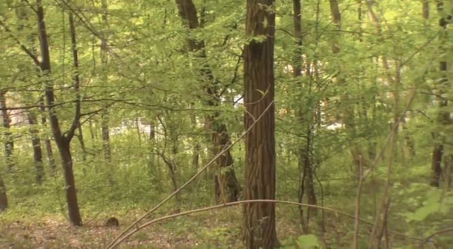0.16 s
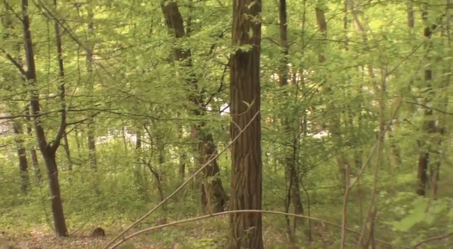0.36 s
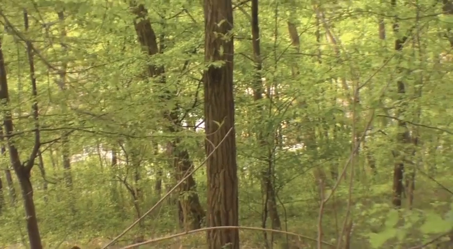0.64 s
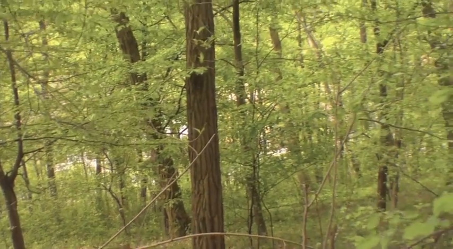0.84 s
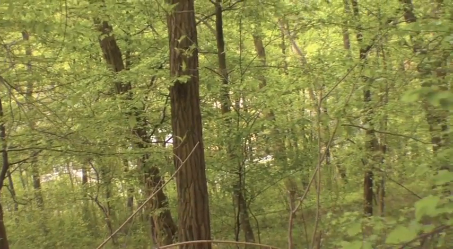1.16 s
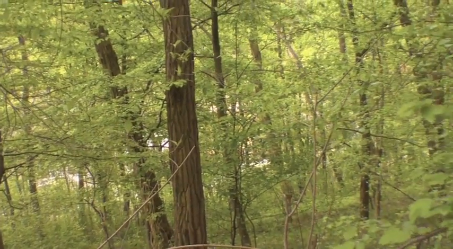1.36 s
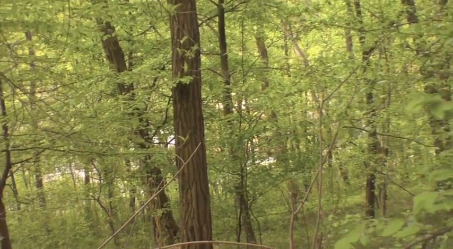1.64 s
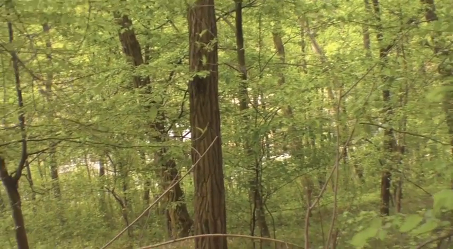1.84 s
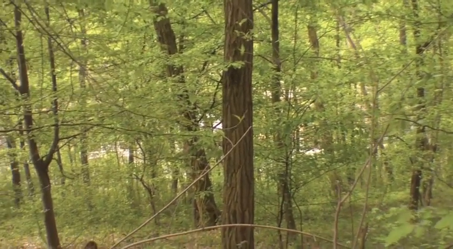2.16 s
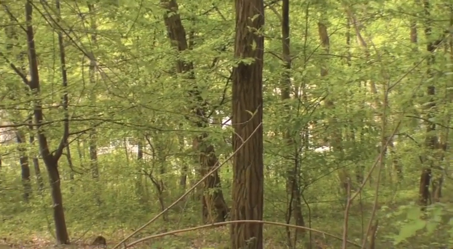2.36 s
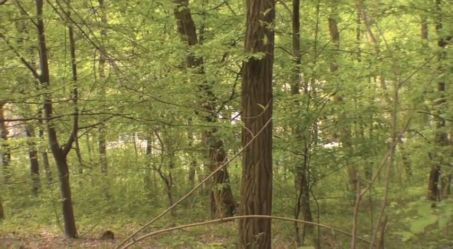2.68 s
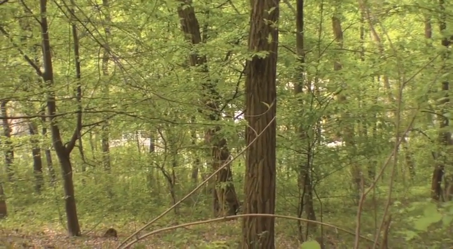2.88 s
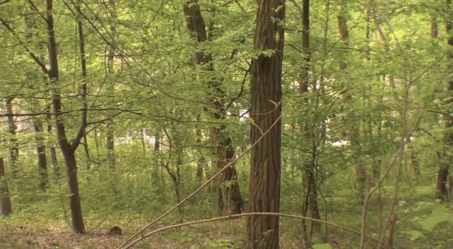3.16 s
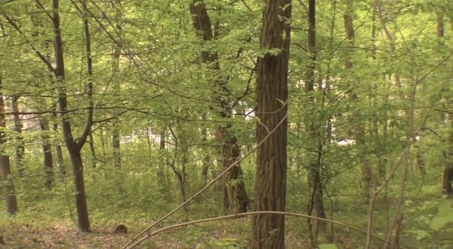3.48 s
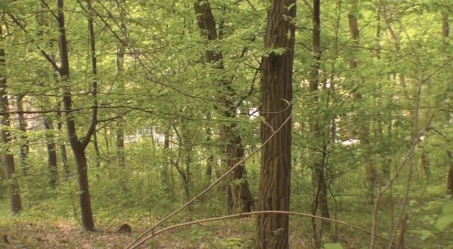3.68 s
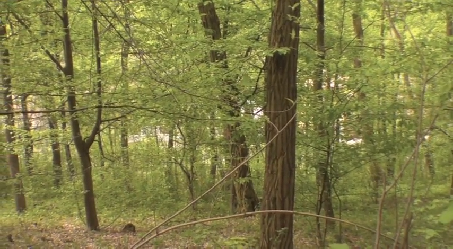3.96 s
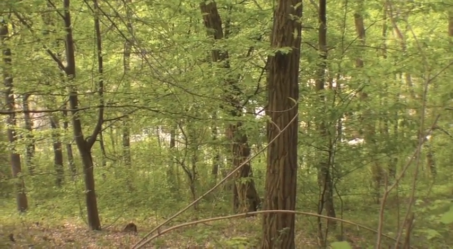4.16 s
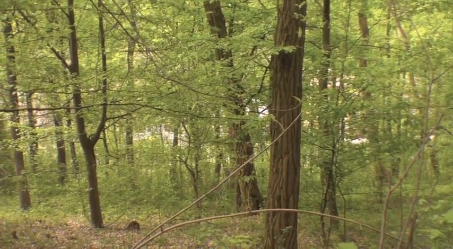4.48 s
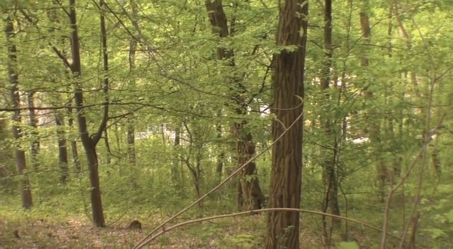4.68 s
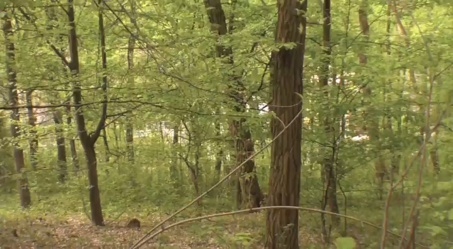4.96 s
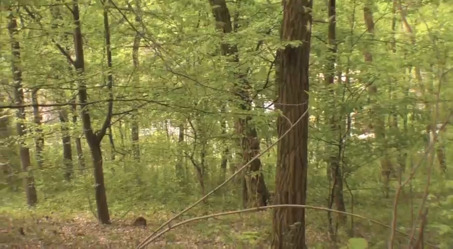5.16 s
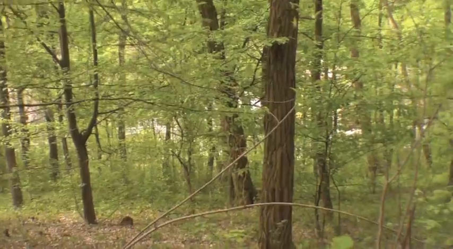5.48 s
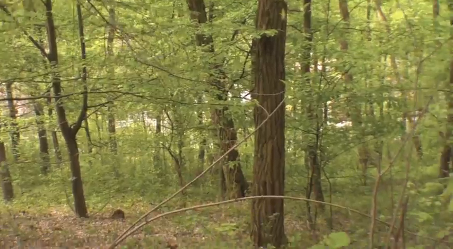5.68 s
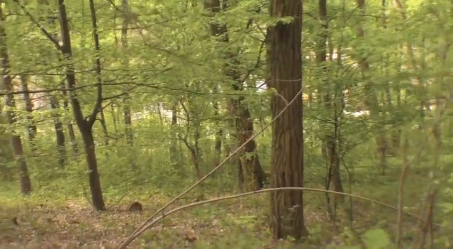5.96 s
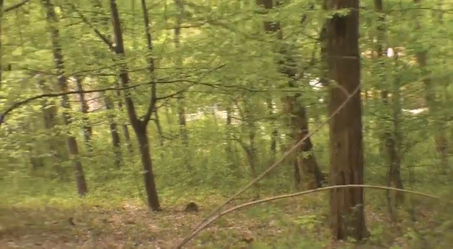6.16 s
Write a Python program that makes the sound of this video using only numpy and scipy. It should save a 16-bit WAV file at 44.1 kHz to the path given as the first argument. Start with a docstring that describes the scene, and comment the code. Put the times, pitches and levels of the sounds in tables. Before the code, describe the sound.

In a leafy wood, many small birds give short whistles, chirps and dry buzzes, with a blurred chorus farther off and a soft tail among the trunks. Beneath lies a quiet, low traffic rumble with a distant engine changing gear. A few tiny leaf ticks sound close to the stereo microphone; after five seconds a foot rustles, then crunches abruptly into dry leaves, by far the loudest event.

```python
"""Birdsong and footfall in a wood

Songbirds whistle, sweep, buzz and trill as gliding or frequency-modulated sines; the trunks scatter them into a
short decaying tail, modelled by convolution with shaped noise. Far traffic is smooth noise with a shaped spectrum.
A distant engine changing gear and an idling drone are sines of varying frequency. Near the microphone a foot shifts
and lands in dry leaves: random impulses crack under its weight, and brief noise bursts snap."""
import sys
import numpy as np
from scipy import signal
from scipy.fft import rfft, irfft
from scipy.io import wavfile

SR = 44100
rng = np.random.default_rng(int(sys.argv[2]) if len(sys.argv) > 2 else 0)


def voltage_ratio(level):
    """Linear amplitude factor for a level in decibels (scalar or array-like)."""
    return 10 ** (np.asarray(level, float) / 20)


def wav_record(signal):
    """Record a signal, one row per channel, as 16-bit PCM in the file named by sys.argv[1]."""
    frames = np.transpose(np.atleast_2d(signal))
    bounded = np.clip(frames, -1, 1)
    # unit amplitude maps onto the largest positive 16-bit level
    quanta = np.round(bounded * 32767).astype(np.int16)
    wavfile.write(sys.argv[1], SR, quanta)


N = 278929

# Harsh bird calls, each an upward flick and then a wide buzz. Each row: start in seconds, flick start in Hz,
# flick length in seconds, flick level in dB, buzz level in dB.
HARSH_CALLS = [(4.657, 2595, 0.043, -42, -47), (4.856, 2598, 0.029, -41, -49.5),
               (5.028, 3350, 0.031, -46, -45.5), (5.218, 3300, 0.017, -37, -48)]


def rms_one(x):
    """Normalization: divide a signal by its root-mean-square value."""
    return x / np.sqrt(np.mean(x ** 2) + 1e-20)


def in_time(rows):
    """Linear interpolation of a time curve: its columns at every sample."""
    s, *columns = np.transpose(rows)
    return [np.interp(np.arange(N) / SR, s, c) for c in columns]


def at_hz(points, hz):
    """Interpolation of a spectrum along a logarithmic frequency axis."""
    known_hz, values = np.array(points).T
    return np.interp(np.log(hz), np.log(known_hz), values)


def drift(rate):
    """Low-pass filtered noise: a random fluctuation of rms 1, slower for a lower rate in Hz."""
    step = 40      # samples between computed values
    r = np.exp(-2 * np.pi * rate * step / SR)
    noise = rng.standard_normal(N // step + 2002)
    slow = signal.lfilter([1], [1, -2 * r, r * r], noise)[2000:]      # the filter has settled
    return np.interp(np.arange(N) / step, np.arange(len(slow)), rms_one(slow))


def coloured(pair, spectrum, likeness):
    """Spectral shaping and partial coherence: independent mid and side become left and right of rms 1."""
    hz = np.maximum(np.fft.rfftfreq(N, 1 / SR), 1)
    alike = np.clip(at_hz(likeness, hz), 0, 1)
    mid, side = rfft(pair) * voltage_ratio(at_hz(spectrum, hz)) * np.sqrt([1 + alike, 1 - alike])
    return rms_one(irfft([mid + side, mid - side], N))


def air():
    """Broadband noise with a falling spectrum: far traffic and air, swelling with the traffic."""
    # Each row: frequency in Hz, relative spectral density in dB per Hz.
    air_spectrum = [(12, -17), (20, 7), (38, -7), (58, 0), (79, -9), (150, -14), (367, -17), (660, -15),
                    (1000, -19), (1440, -19), (1860, -22), (3250, -23), (6360, -35), (14700, -37),
                    (16000, -35)]
    # Each row: frequency in Hz, left-right coherence from 0 to 1.
    air_likeness = [(60, 0.3), (180, 0.63), (550, 0.9), (1650, 0.94), (4970, 0.66), (15000, 0.044)]
    # Slow level of the traffic. Each row: time in seconds, level in dB before random drift.
    traffic_swell = [(0.0, -39), (5.17, -37.9), (6.32, -36)]
    swell_db, = in_time(traffic_swell)
    noise = coloured(rng.standard_normal((2, N)), air_spectrum, air_likeness)
    return voltage_ratio(swell_db + 0.71 * drift(5.9)) * noise


def hum(curve, wobble_db):
    """Phase integration of a varying frequency: a low engine order whose level wobbles on its way through air."""
    hz, db = in_time(curve)
    phase = 2 * np.pi * np.cumsum(hz * (1 + 0.011 * drift(8.5))) / SR
    level = voltage_ratio(db + wobble_db * drift(3.3))
    return np.sqrt(2) * level * np.sin(phase) * voltage_ratio([[.8], [-.8]])      # slightly stronger on the left


def engine():
    """Firing frequency follows engine speed: a distant engine slows and changes gear."""
    # Each row: time in seconds, mean firing frequency in Hz, level in dB before wobble and left-right offset.
    engine_curve = [(0, 90.5, -48.5), (1.02, 93, -55.5), (1.87, 95.2, -46.5), (2.1, 96.9, -57.5),
                    (2.75, 96.9, -51), (3.15, 90, -52), (3.33, 77.5, -45), (3.45, 70.1, -43.5),
                    (3.8, 58.63, -32.5), (4.1, 48.06, -45.5), (4.3, 49, -43.5), (4.49, 63.7, -36.5),
                    (4.56, 68.6, -43), (4.87, 69.04, -44), (5.05, 68.6, -33), (5.67, 68.8, -34.5),
                    (5.76, 70.6, -44.5), (6.05, 69.6, -33.5), (6.32, 74.7, -44)]
    return hum(engine_curve, wobble_db=1.2)


def drone():
    """A nearly steady low sine: an idling engine."""
    # Each row: time in seconds, mean frequency in Hz, level in dB before wobble and left-right offset.
    drone_curve = [(0, 43.5, -51), (2.27, 45.1, -43), (3.7, 46.8, -48.5), (5.23, 46.4, -52),
                   (6.32, 46.5, -40.5)]
    return hum(drone_curve, wobble_db=1.5)


def whistles(notes, waver, overtone_db, edge, flutter_db):
    """Frequency glide by phase integration: unsteady sines with one overtone and soft edges, each from its side.

    Each note: start and length in s; start, middle and end in Hz; level in dB."""
    out = np.zeros((2, N))
    unsteady = 1 + waver * drift(60)
    sides_db = rng.normal(0, 0.7, len(notes))
    for (s, length, start, middle, end, db), side in zip(notes, sides_db):
        at = round(s * SR)
        u = np.linspace(0, 1, max(round(length * SR), 8))[:N - at]
        # a parabola through the start, middle and end frequencies
        hz = start * (1 - u) * (1 - 2 * u) + 4 * middle * u * (1 - u) + end * u * (2 * u - 1)
        phase = 2 * np.pi * np.cumsum(hz * unsteady[at:at + len(u)]) / SR
        rise_or_fall = np.minimum(u, (1 - u) / 2) / edge      # the end fades slower
        shape = np.sin(np.pi / 2 * np.clip(rise_or_fall, 0, 1))
        wave = np.sin(phase) + voltage_ratio(overtone_db) * np.sin(2 * phase)
        out[:, at:at + len(u)] += np.sqrt(2) * voltage_ratio(db) * shape * wave * voltage_ratio([[side], [-side]])
    return out * voltage_ratio(flutter_db * drift(64))      # moving air makes the level flutter


def chorus(band_hz, count):
    """Superposition of many short sweeps at random moments and pitches inside one register; rms 1."""
    when, pitch, sweep, length, size = rng.random((count, 5)).T
    hz = band_hz[0] + (band_hz[1] - band_hz[0]) * pitch
    glide = 1 + 0.2416 * (sweep - .5)
    start_s = when * (N / SR - .01)
    length_s = 0.01155 + 0.0402 * length
    rows = np.transpose([start_s, length_s, hz / glide, hz, hz * glide, 10 * size])
    return rms_one(whistles(rows, waver=0.011, overtone_db=-35, edge=0.23, flutter_db=0.0))


def far_chorus():
    """Dense superposition in two registers: far birds too blurred to tell notes apart."""
    # Levels ahead of the direct and scattered gains. Each row: time in seconds, low voices in dB, high voices in dB.
    chorus_levels = [(0, -58, -72), (1.3, -68, -95), (2.6, -73, -62), (3.5, -51, -54), (5.2, -52.5, -60),
                     (6.32, -98, -64)]
    low_db, high_db = in_time(chorus_levels)
    low = voltage_ratio(low_db) * chorus((2500, 4100), count=500)
    high = voltage_ratio(high_db) * chorus((4200, 5870), count=500)
    return low + high


def weight():
    """Exponential growth and decay: each tread builds up and lets go steadily in dB; the heaviest counts."""
    # Each row: time of full weight in seconds, level in dB, build-up in dB per second, release in dB per second.
    treads = [(.1, -55, 20.0, 30.0), (2.25, -53.5, 60.0, 30.0), (5.32, -47.5, 300.0, 5.0),
              (5.41, -44, 200.0, 17.5), (5.585, -35, 69, 377), (5.62, -46, 313, 176),
              (6.1, -45.5, 160.0, 14), (6.222, -18.5, 698, 12.0), (6.245, -16, 400.0, 70.0),
              (6.318, -17, 400.0, 60.0)]
    t = np.arange(N) / SR
    each_db = [top - np.maximum(up * (s - t), down * (t - s)) for s, top, up, down in treads]
    db = np.max(each_db, axis=0)
    return voltage_ratio(db) * (db > -61.5)      # lighter weight cracks nothing


def leaf_cracks():
    """Random impulse process: cracks of uneven size under the sole, denser the harder it presses."""
    # Each row: frequency in Hz, relative spectral density in dB per Hz.
    leaf_spectrum = [(59, -45), (100, -12), (513, -4.5), (691, -4), (2630, -1.5), (8830, -4), (12900, 0),
                     (15000, -2.5), (16000, -29)]
    # Each row: frequency in Hz, left-right coherence from 0 to 1.
    leaf_likeness = [(100, 0.92), (4000, 1), (12000, 0.84)]
    pressure = weight()
    cracks_per_s = 22000      # at a weight of -12.5 dB, before random drift
    density = (pressure / voltage_ratio(-12.5) + 1e-6) ** .35 * voltage_ratio(4.3 * drift(36))
    share = np.clip(cracks_per_s / SR * density, 1e-3, .9)      # chance of a crack per sample
    sizes = voltage_ratio(4.2 * np.minimum(rng.exponential(1, (2, N)), 4)) * rng.choice([-1, 1], (2, N))
    cracks = sizes * (rng.random((2, N)) < share) / np.sqrt(share)      # sparse cracks carry the same energy
    texture = coloured(cracks, leaf_spectrum, leaf_likeness)
    return pressure * voltage_ratio(0.75 * drift(31)) * texture * voltage_ratio([[-.5], [.4]])


def snaps():
    """Impulsive excitation: high-passed, exponentially dying noise bursts for single leaves and twigs snapping."""
    # Each row: start in seconds, peak level in dB before the left-right offset.
    snap_peaks = [(0.0633, -30), (0.1291, -33), (0.5243, -32), (1.1478, -35), (2.2797, -35), (3.107, -27.5),
                  (3.5059, -28), (5.3143, -31), (5.3238, -28), (5.3656, -31), (5.404, -27), (5.4151, -29),
                  (5.446, -27.5), (5.4747, -32), (5.5262, -18), (5.5453, -20), (5.578, -25), (5.8419, -26),
                  (5.8685, -25), (6.0801, -32), (6.1769, -47), (6.2022, -13.5), (6.2694, -16), (6.3154, -6)]
    out = np.zeros((2, N))
    t = np.arange(SR // 100) / SR
    bright = signal.butter(2, 6500, "high", fs=SR, output="sos")
    for (s, db), burst in zip(snap_peaks, rng.standard_normal((len(snap_peaks), len(t)))):
        snap = signal.sosfilt(bright, burst * np.exp(-t / 0.0014))
        snap /= np.abs(snap).max()
        at = round(s * SR)
        out[:, at:at + len(t)] += snap[:N - at] * voltage_ratio(db) * voltage_ratio([[-.7], [.7]])
    return out


def called(call, times):
    """Repetition of a motif: a call's syllables placed at each of its times."""
    return [(s + delay, *shape, db + part_db) for s, db in times for delay, *shape, part_db in call]


def syllables():
    """Frequency contours of the near whistles up in the crowns, as rows for whistles()."""
    # Single notes, held or gliding. Each row: start in seconds, length in seconds, start in Hz, end in Hz,
    # level in dB.
    single_notes = [(.01, 0.0077, 2730, 3600, -38.5), (0.037, 0.022, 3190, 2790, -48),
                    (0.081, 0.011, 2650, 3150, -44), (.135, 0.01, 4200, 3700, -46.5),
                    (0.151, 0.012, 2680, 3300, -49), (0.312, 0.026, 3590, 2810, -45.5),
                    (0.331, 0.036, 2855, 2055, -43), (.34, 0.11, 2850, 2874, -52),
                    (0.482, 0.057, 3550, 4190, -46), (0.615, 0.015, 3790, 3170, -45),
                    (0.679, 0.043, 3030, 3240, -50), (.724, 0.066, 3370, 3540, -51),
                    (1.361, .01, 5500, 4850, -49), (1.35, 0.071, 5640, 5640, -56),
                    (1.667, 0.016, 3720, 2970, -49), (1.71, 0.027, 5530, 5540, -50.5),
                    (1.745, .017, 3900, 3340, -45), (2.0, .012, 3380, 4000, -51),
                    (2.009, 0.027, 3270, 3035, -42), (2.05, 0.06, 3280, 3170, -54),
                    (2.16, .015, 4420, 3700, -52), (2.172, 0.026, 3150, 3340, -45),
                    (2.214, 0.047, 3200, 3310, -50), (2.269, 0.028, 3870, 2870, -48),
                    (2.385, 0.016, 3180, 2700, -50), (2.627, 0.12, 3640, 3650, -45),
                    (2.63, 0.024, 3400, 2500, -53), (2.67, .018, 3720, 4820, -44),
                    (2.684, .04, 4870, 4590, -43.5), (2.633, .018, 5700, 5780, -53),
                    (2.718, .08, 5760, 5740, -56), (2.716, 0.014, 4600, 3750, -37.5),
                    (2.738, .018, 3210, 2300, -55), (2.77, 0.037, 3300, 3700, -46),
                    (2.803, 0.035, 3535, 2660, -39), (2.81, 0.027, 3380, 3790, -42),
                    (2.879, 0.045, 5780, 5850, -54), (2.994, 0.025, 3590, 2780, -43.5),
                    (3.031, 0.038, 3070, 3670, -42.5), (3.057, 0.032, 3680, 3770, -39.5),
                    (3.14, 0.068, 2500, 2550, -61), (3.038, .042, 2530, 2494, -50),
                    (3.133, .03, 5200, 4750, -47), (3.214, 0.076, 2900, 2802, -39.5),
                    (3.264, 0.063, 2720, 2640, -40), (3.476, .034, 2400, 2490, -47),
                    (3.501, 0.054, 3500, 3770, -43.5), (3.527, .014, 3550, 2930, -44),
                    (3.545, 0.044, 2855, 2620, -42), (3.582, .047, 2321, 2360, -46),
                    (3.632, 0.071, 2300, 2574, -43.5), (3.64, .04, 2600, 2800, -46),
                    (3.778, 0.069, 3090, 3300, -36.5), (3.787, .08, 4920, 5530, -61),
                    (3.846, 0.027, 2810, 2900, -42.5), (3.96, 0.06, 2710, 2616, -43),
                    (4.088, 0.043, 3610, 3770, -40), (4.118, 0.063, 3100, 2610, -38),
                    (4.176, 0.062, 2562, 2560, -39), (4.365, 0.069, 3120, 3337, -35.5),
                    (4.379, 0.084, 5456, 5360, -35.5), (4.42, 0.092, 2980, 2970, -41),
                    (4.44, 0.042, 5300, 5040, -33), (4.621, 0.097, 5370, 5280, -44.5),
                    (4.691, 0.094, 5150, 5350, -36.5), (4.752, 0.17, 3740, 3700, -49),
                    (4.79, 0.034, 5360, 5290, -41.5), (4.937, 0.022, 3550, 2920, -39),
                    (5.04, 0.092, 3480, 3630, -42.5), (5.11, 0.12, 3517, 3608, -40),
                    (5.22, .073, 3616, 3440, -38), (5.31, 0.037, 6335, 5600, -42),
                    (5.321, 0.093, 5590, 5590, -42), (5.332, 0.037, 5400, 4730, -44),
                    (5.364, .03, 4400, 3970, -43), (5.693, 0.049, 3930, 3880, -46),
                    (5.733, 0.018, 2735, 3150, -38.5), (5.798, 0.019, 2790, 3164, -40),
                    (5.81, 0.037, 3230, 3400, -44.5), (5.871, 0.031, 2808, 3130, -37),
                    (5.903, 0.082, 3060, 3166, -45.5), (5.958, 0.051, 5760, 5540, -47),
                    (5.966, 0.019, 7600, 5670, -45.5)]
    # Syllables of a repeated call. Each row: delay in seconds, length in seconds, start in Hz, middle in Hz,
    # end in Hz, level in dB relative to the call.
    peaked_call = [(-.006, 0.023, 2290, 2285, 2340, -0.5), (.012, .048, 2330, 2935, 4200, 0.7),
                   (.074, .026, 3770, 3010, 2450, 0.5), (.097, .03, 2450, 2170, 1908, -0.5)]
    # Each row: time of the call in seconds, level in dB.
    peaked_times = [(.497, -45.5), (.76, -45), (1.03, -46)]
    rows = []
    for s, length, start, end, db in single_notes:
        done = min(.5 + 4.0 * length, .85)      # longer glides have done more of their way by the middle
        rows.append((s, length, start, start + (end - start) * done, end, db))
    flick_top_hz = 4850
    for s, hz, length, db, _ in HARSH_CALLS:
        middle = .9 * (hz + flick_top_hz) / 2      # sags below a straight rise
        rows.append((s, length, hz, middle, flick_top_hz, db))
    trill_hz, trill_per_s, trill_db = 5850, 27, -59.5
    for k in range(6):
        rows.append((2.42 + k / trill_per_s, .018, trill_hz * .97, trill_hz, trill_hz * .96, trill_db))
    return rows + called(peaked_call, peaked_times)


def buzz_rows():
    """Modulation contours: rows of start s, length s, centre Hz at start and end, swing Hz, level dB."""
    # Buzzes of level pitch. Each row: start in seconds, length in seconds, centre in Hz, pitch swing in Hz,
    # level in dB before drift and mixing.
    level_buzzes = [(0.238, 0.097, 4490, 590, -51.5), (.7, 0.16, 3320, 400, -56),
                    (1.41, 0.042, 4130, 400, -55.5), (1.76, 0.11, 3660, 400, -61),
                    (2.247, 0.034, 4200, 250, -52), (2.322, .024, 4100, 250, -50),
                    (2.342, 0.026, 3170, 220, -48), (2.977, 0.077, 4230, 597, -47.5),
                    (3.168, 0.078, 4100, 300, -49), (3.34, .094, 3980, 400, -51),
                    (3.57, 0.27, 3820, 300, -53), (3.91, 0.088, 3600, 500, -48),
                    (3.982, .026, 5870, 400, -56), (4.1, .055, 5460, 500, -58),
                    (4.225, .054, 5680, 400, -59), (4.327, 0.067, 4460, 400, -54),
                    (4.439, .051, 5960, 500, -54.5), (3.6, 0.14, 2570, 251, -53),
                    (4.652, 0.097, 2705, 400.3, -44), (4.86, 0.095, 3200, 506, -45),
                    (5.38, 0.058, 4100, 300, -53), (5.972, 0.069, 5400, 400, -65)]
    # Rising buzzes at an even pace. Each entry: level in dB before drift and mixing.
    rising_levels = [-52.5, -52, -55, -62, -54, -52.5, -56]
    rows = [(s, length, hz, hz, swing, db) for s, length, hz, swing, db in level_buzzes]
    first_s, every_s = 2.85, .187
    rows += [(first_s + k * every_s, .105, 4550, 5040, 543, db) for k, db in enumerate(rising_levels)]
    # the buzz of a harsh call starts shortly after its flick does
    return rows + [(s + .012, .09, 3300, 4135, 747, db) for s, *_, db in HARSH_CALLS]


def buzzes():
    """Frequency modulation: a whistle shaken fast and unevenly in pitch fills a band whose centre may glide."""
    out = np.zeros(N)
    shakes_per_s = 140 * voltage_ratio(2.1 * drift(40.54))
    shake = np.sin(2 * np.pi * np.cumsum(shakes_per_s) / SR)
    for s, length, start, end, swing, db in buzz_rows():
        at = round(s * SR)
        u = np.linspace(0, 1, round(length * SR))
        hz = start + (end - start) * np.sqrt(u) + swing * shake[at:at + len(u)]
        tone = np.sin(2 * np.pi * np.cumsum(hz) / SR)
        out[at:at + len(u)] += np.sqrt(2) * voltage_ratio(db) * np.sin(np.pi * u) ** .5 * tone
    return out * voltage_ratio(0.83 * drift(53))


def low_arches():
    """A parabolic frequency contour: low whistles that rise and fall again."""
    # Each row: delay in seconds, length in seconds, start in Hz, middle in Hz, end in Hz, relative level in dB.
    arch_call = [(0.0065, 0.0656, 1830, 2270, 1960, 0.1)]
    # Each row: time of the call in seconds, level in dB.
    arch_times = [(4.868, -36), (5.007, -35)]
    return whistles(called(arch_call, arch_times), waver=.004, overtone_db=-32, edge=.22, flutter_db=2.2)


def trunks(x):
    """Multiple scattering as convolution: dense trunk echoes build up and die, much alike in both channels.

    Long waves bend round a trunk and return weakly; foliage dulls the short ones."""
    t = np.arange(SR) / SR
    t60_s, build_up_s, width = .65, 0.0083, 0.27
    envelope = voltage_ratio(-60 * t / t60_s) * (1 - np.exp(-t / build_up_s))
    common, own = rng.standard_normal((2, SR)) * envelope
    common *= voltage_ratio(1.1 * drift(4)[:SR])      # stands of trees send echoes back in clumps
    echoes = np.array([common + width * own, common - width * own])
    trunk_hz, foliage_hz = 1340, 6000
    echoes = signal.lfilter(*signal.butter(1, [trunk_hz, foliage_hz], "band", fs=SR), echoes)
    echoes /= np.sqrt(np.sum(echoes[0] ** 2))
    return signal.fftconvolve(x, echoes, axes=1)[:, :N]


def birds():
    """Direct-to-scattered ratio: near notes come mostly direct, buzzes and the far chorus are more scattered."""
    far = far_chorus()
    near = whistles(syllables(), waver=.004, overtone_db=-32, edge=.15, flutter_db=2.2)
    buzz = buzzes()
    arches = low_arches()
    direct = near + arches + 0.16 * far + 1.4 * buzz
    scattered = trunks(voltage_ratio(-7.5) * near + voltage_ratio(-15) * arches + far + buzz)
    return direct + scattered


def scene():
    """Linear superposition of traffic, engines, birds and leaves."""
    return air() + engine() + drone() + birds() + leaf_cracks() + snaps()


def band_limit(x):
    """A steep low-pass at the top of the band."""
    return signal.sosfilt(signal.butter(12, 16390, fs=SR, output="sos"), x)


def record(dry):
    """Linear phase delay and low-pass filtering: a small stereo microphone whose right port lags 0.2 sample."""
    lag_samples = np.array([[0], [.2]])
    lag = np.exp(-2j * np.pi * np.arange(N // 2 + 1) / N * lag_samples)
    lagged = irfft(rfft(dry) * lag, N)
    low_pass = signal.ellip(10, .5, 70, 15400, fs=SR, output="sos")
    mix = signal.sosfilt(low_pass, lagged)
    return band_limit(mix)


dry = scene()
out = record(dry)
wav_record(out)
```